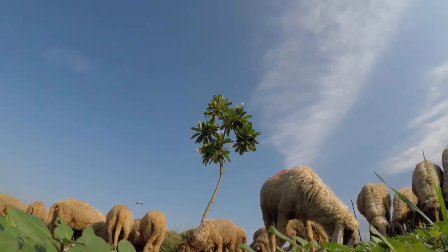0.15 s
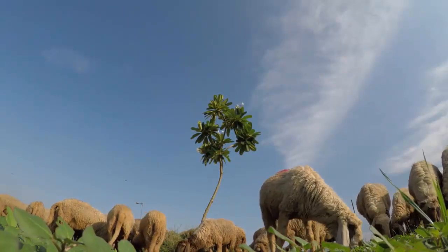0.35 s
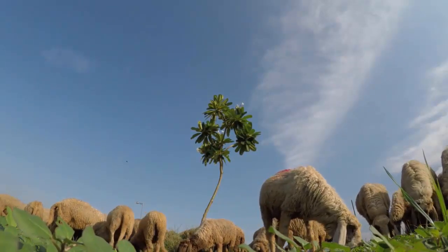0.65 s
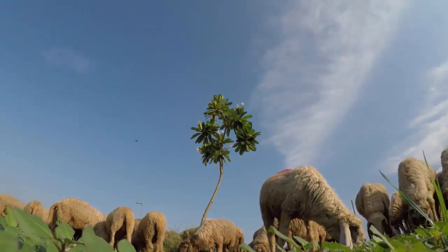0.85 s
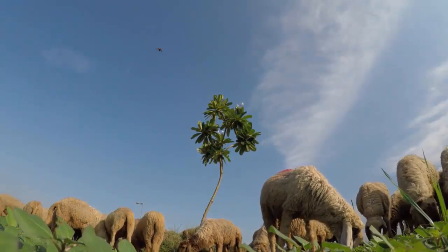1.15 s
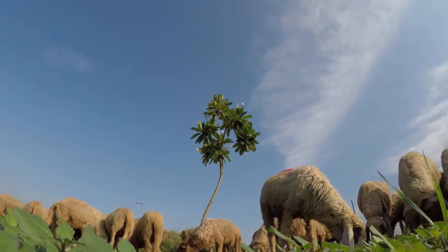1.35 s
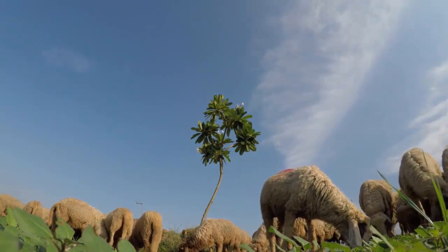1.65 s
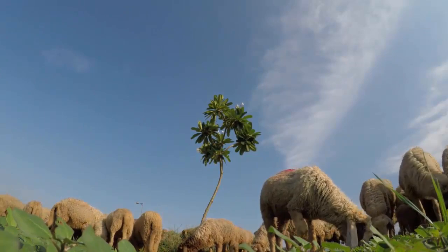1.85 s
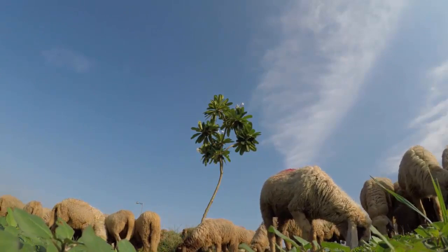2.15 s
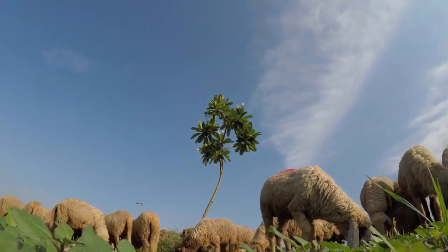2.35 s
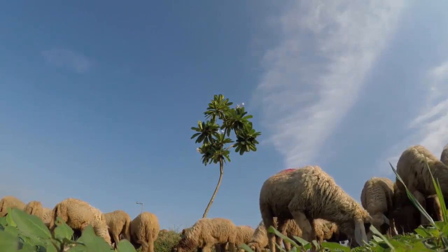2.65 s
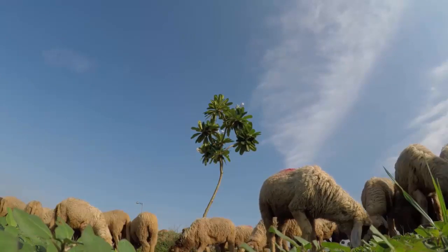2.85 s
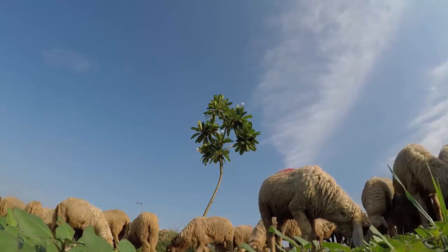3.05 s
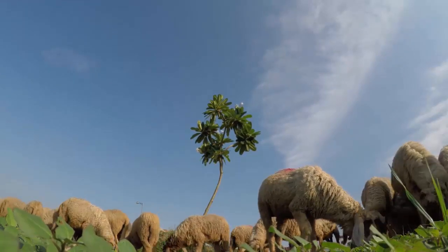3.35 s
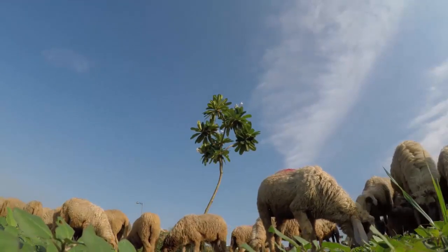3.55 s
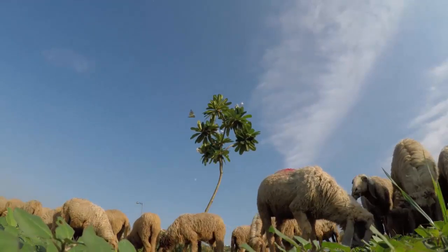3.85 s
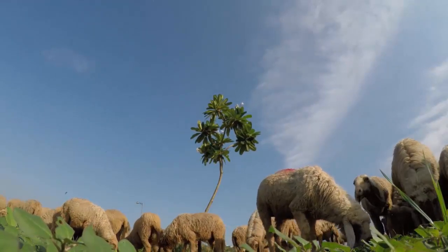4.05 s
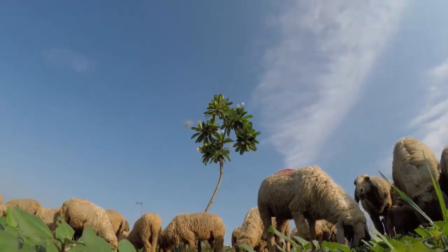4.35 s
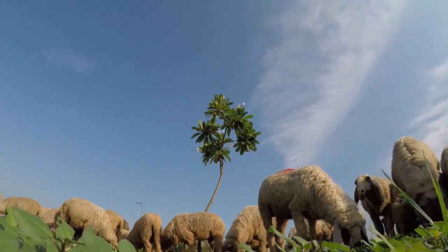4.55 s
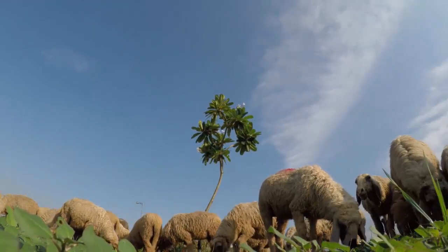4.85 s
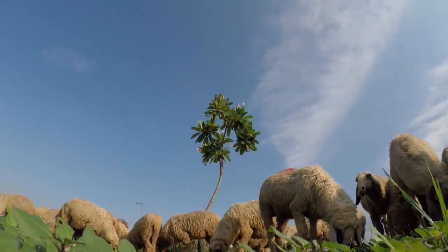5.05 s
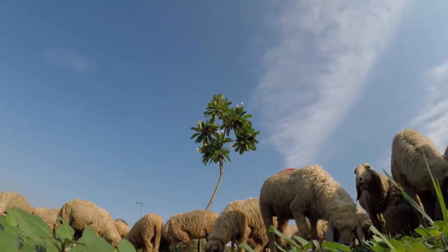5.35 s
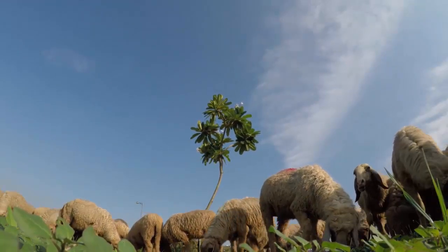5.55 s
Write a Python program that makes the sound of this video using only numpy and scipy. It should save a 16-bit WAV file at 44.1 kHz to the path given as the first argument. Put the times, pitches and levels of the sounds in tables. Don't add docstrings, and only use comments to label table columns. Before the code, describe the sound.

Several sheep bleat over one another in an open pasture, pause briefly with grass tearing, then a low call and a loud final bleat.

```python
import sys
import numpy as np
from scipy import signal
from scipy.fft import rfft, irfft, next_fast_len
from scipy.io import wavfile
from scipy.ndimage import uniform_filter1d

SR = 44100
rng = np.random.default_rng(int(sys.argv[2]) if len(sys.argv) > 2 else 0)


def voltage_ratio(decibels):
    exponent = np.asarray(decibels, float) / 20
    return 10 ** exponent


def inscribe(sig):
    pcm = np.round(np.clip(np.atleast_2d(sig).T, -1, 1) * 32767)
    wavfile.write(sys.argv[1], SR, pcm.astype(np.int16))


N = 250929


def evened(x):
    return x / np.sqrt(np.mean(x ** 2) + 1e-20)


def read(points, hz):
    f, value = np.transpose(points)
    return np.interp(np.log(hz + 1), np.log(f + 1), value)


def add(mix, s, sound):
    part = mix[round(s * SR):][:len(sound)]
    part += sound[:len(part)]


def drift(size, span):
    width = max(int(span / 50), 1)
    coarse = uniform_filter1d(rng.standard_normal(2000), width)
    coarse = uniform_filter1d(coarse, width)
    return np.interp(np.arange(size) / 50, np.arange(2000), evened(coarse))


def coloured(points):
    spectrum = rfft(rng.standard_normal(N))
    shape_db = read(points, np.fft.rfftfreq(N, 1 / SR))
    return evened(irfft(spectrum * voltage_ratio(shape_db), N))


def resonate(x, hz, *widths):
    turn = np.exp(2j * np.pi * np.cumsum(hz * np.ones(len(x))) / SR)
    low = x * turn.conj()
    for r in np.exp(-np.pi * np.array(widths) / SR):
        low = signal.lfilter([1 - r], [1, -r], low)
    return 2 * (turn * low).real


def patchy(x, depth_db):
    hz, _, z = signal.stft(x, SR, nperseg=512)
    patches = uniform_filter1d(rng.standard_normal(z.shape[1:]), 6, 0)
    patches = uniform_filter1d(patches, 8, 1)
    change_db = depth_db * evened(patches) * (hz[:, None] > 1500)
    return signal.istft(z * voltage_ratio(change_db), SR, nperseg=512)[1][:, :N]


# (f/Hz, level/dB)
GRIT = [(20, -20.5), (60, -22.5), (110, -21.5), (300, -24), (1500, -26), (4200, -28.5), (5400, -33),
        (7000, -20), (11000, -29), (13500, -19), (15000, -26.5), (15700, -10)]
# (f/Hz, level/dB)
APART = [(20, -35), (400, -24), (5000, -7), (8000, -7), (11500, -7.5), (13500, -14), (15500, -7.5)]


def swelling_hiss(dry):
    loudness = abs(uniform_filter1d((dry ** 2).mean(0), 1500)) ** 0.42
    grit = coloured(GRIT) + voltage_ratio(-10) * coloured(APART) * [[1], [-1]]
    return voltage_ratio(-26.5) * loudness * patchy(grit, 3.73)


# (f/Hz, level/dB per Hz)
AIR = [(12, -33.5), (20, -25), (33, -43), (66, -29), (383, -36.5), (1020, -39), (1420, -43), (4800, -61),
       (7760, -62.5), (14300, -40), (15600, -50)]


def still_air():
    shared = coloured(AIR)
    unlike = np.array([coloured(AIR), coloured(AIR)])
    return voltage_ratio(-72) * (shared + 0.16 * unlike)


# (f/Hz, fade time/s)
FIELD = [(200, .25), (600, .35), (1000, .95), (2000, .75), (3000, .45), (8000, .3)]


def field(x):
    taps = np.zeros((2, SR))
    at = np.arange(300, SR - 20, 20) + rng.integers(0, 20, (2, (SR - 301) // 20))
    np.put_along_axis(taps, at, rng.choice([-1., 1.], at.shape), 1)
    hz, t, z = signal.stft(taps, SR, nperseg=256)
    fade_db = -60 * t / read(FIELD, hz)[:, None]
    tail = signal.istft(z * voltage_ratio(fade_db), SR, nperseg=256)[1]
    return signal.fftconvolve(x[None], tail / np.linalg.norm(tail[0]), axes=1)[:, :N]


# (t/s, level/dB, f/Hz)
BIRD = [(2.945, -78, 6920), (2.953, -60.5, 6920), (2.963, -59, 7150), (2.989, -67, 7100),
        (3.019, -97.5, 6960), (3.031, -81.5, 7240), (3.17, -100, 7180)]


def bird():
    s, db, hz = np.transpose(BIRD)
    t = np.arange(s[0], s[-1], 1 / SR)
    whistle = resonate(rng.standard_normal(len(t)), np.interp(t, s, hz), 60)
    return s[0], voltage_ratio(np.interp(t, s, db)) * evened(whistle) * signal.windows.tukey(len(t), .05)


# (t/s, peak level/dB, centre f/Hz)
GRASS = [
    (2.983, -70, 897),
    (3.467, -65.5, 2100),
    (3.492, -55, 1170),
    (3.509, -56, 1010),
    (3.569, -57, 1400),
    (3.597, -59, 1290),
    (3.62, -56, 600),
    (3.669, -31, 1900),
    (4.531, -33.5, 1900),
    (4.546, -38.5, 1840),
]


def grass(mix):
    t = np.arange(2000) / SR
    for s, db, hz in GRASS:
        burst = resonate(rng.standard_normal(len(t)), hz, 1200, 500) * np.exp(-t / 0.011)
        burst = np.diff(burst, prepend=0)
        add(mix, s, voltage_ratio(db) * burst / abs(burst).max())


def snort():
    t = np.arange(2600) / SR
    puff = resonate(rng.standard_normal(len(t)), 4700, 1500, 900)
    return 4.70, voltage_ratio(-33.5) * evened(puff) * np.sin(np.pi * t / t[-1]) ** 2


# (t/s, pitch drop as a share, length/s, level change/dB)
SLIPS = [(.552, 0.023, .012, -5), (.706, .03, 0.018, 2), (.926, 0.013, .012, 0), (1.717, .01, 0.0099, -3),
         (1.769, .005, 0.013, -2.5), (2.158, 0.0033, 0.015, -4), (2.45, 0.016, .012, 1.5),
         (2.698, 0.041, .015, 2), (3.939, 0.0033, 0.025, -0.5), (4.154, 0.013, 0.028, -0.5),
         (4.566, .005, 0.011, -7.5), (4.63, 0.0038, 0.013, -5.5), (5.05, 0.021, 0.014, -3),
         (5.255, .005, .012, -4), (5.352, .005, .03, -4), (5.463, .02, .011, 1), (5.59, .0095, .012, 0)]


def catches(t, hz, effort_db, breath):
    for at, share, slip_s, dip_db in SLIPS:
        catch = np.exp(-((t - at) / slip_s) ** 2)
        hz = hz * (1 - share * catch)
        effort_db = effort_db + dip_db * catch
        breath = breath - 0.007 * dip_db * catch
    return hz, effort_db, breath


def folds(hz, breath):
    wobble = 0.0033 + 0.017 * breath
    turns = np.cumsum(hz * (1 + wobble * drift(len(hz), 300))) / SR
    off = turns - np.round(turns)
    pulses = np.sinc(32000 * off / hz) * np.cos(np.pi * off) ** 2 / np.sqrt(hz)
    puffs = (1.2 + np.exp(-(turns % 1) / .3)) * rng.standard_normal(2 * SR)[:len(hz)]
    puffs = signal.lfilter(*signal.butter(1, [500, 3500], "band", fs=SR), puffs)
    return evened(pulses) + np.clip(breath, 0, 1) * evened(puffs)


def through_throat(drive, throat, mouth, effort_db, bright_db, slack):
    voice = np.zeros(len(drive))
    lost_db = uniform_filter1d(effort_db.max() - effort_db, 4000).clip(0, 12)
    for k, (f, width, db) in enumerate(throat):
        level_db = db + 1.49 * drift(len(drive), 1500)
        beamed = np.clip(np.log2(f / 2800), 0, 1)
        level_db = level_db + beamed * (bright_db + 31.5)
        level_db = level_db - 8 * slack * (f > 2300)
        kept = 0.39 * (f < 1200) if k else -0.86
        level_db = level_db + kept * lost_db
        voice -= (-1) ** k * voltage_ratio(level_db) * resonate(drive, f * mouth, 4.7 * width, width)
    return signal.lfilter(*signal.butter(3, 130, "high", fs=SR), voice)


def bleat(rows, throat, swell_s, breath, mouth):
    s, *columns = np.transpose(rows)
    t = np.arange(max(s[0], 0), s[-1] + .02, 1 / SR)
    effort_db, hz, bright_db = (np.interp(t, s, c) for c in columns)
    hz = uniform_filter1d(hz, 1800, mode="nearest")
    slack = 1 - hz / hz.max()
    mouth = mouth * (1 + 0.11 * slack)
    breath = breath + 0.45 * slack + .1 * np.exp(-(t - t[0]) / 0.048)
    hz, effort_db, breath = catches(t, hz, effort_db, breath)
    voice = through_throat(folds(hz, breath), throat, mouth, effort_db, bright_db, slack)
    swell = np.minimum((t - t[0]) / swell_s, 1) ** 2
    fade = np.minimum(t[::-1] - t[0], .02) / .02
    return t[0], voltage_ratio(effort_db) * evened(voice) * fade * swell


# (t/s, effort level/dB, pitch f/Hz, brightness from where the head faces, level/dB)
BLEAT_1 = [(0.0, -39.5, 219, -34), (0.044, -35.5, 217.7, -27.5), (0.094, -29, 236, -18.5),
           (0.234, -19.5, 266, -27.5), (0.352, -20.5, 271.5, -17.5), (0.66, -22.5, 261.3, -14),
           (0.74, -29.5, 251.7, -10.5), (0.85, -27.5, 247.7, -9), (0.95, -33.5, 206.7, -11)]
BLEAT_2 = [(0.69, -38, 168.5, -15.5), (0.856, -27, 231.7, -14), (0.954, -24, 282.5, -16),
           (1.086, -26, 290.5, -21), (1.252, -27.5, 296, -43.5), (1.4, -30.5, 291.8, -24.5),
           (1.756, -29.5, 289.7, -26.5), (1.985, -32, 278.4, -19), (2.04, -36, 236.6, -6)]
BLEAT_3 = [(1.27, -49, 185.2, -41), (1.38, -40.5, 219.6, -22), (1.47, -35.5, 252.2, -25),
           (1.6, -34.5, 264.3, -27.5), (1.9, -36, 255.1, -31.5), (2.05, -40, 250, -26.5),
           (2.15, -33, 247.7, -33.5), (2.36, -36.5, 239.2, -32), (2.47, -64.5, 233, -14.5)]
BLEAT_4 = [(1.86, -5.5, 166.7, -30), (1.944, -28.5, 174.5, -37), (2.078, -30, 237.8, -25),
           (2.188, -24, 255.6, -36.5), (2.37, -25, 262.9, -30.5), (2.534, -25.5, 260.3, -31),
           (2.812, -31.5, 242.9, -17.5), (2.843, -32.5, 220, -21), (2.87, -49.5, 191, -13.5)]
BLEAT_5 = [(3.645, -65, 146.7, -32.5), (3.667, -41.5, 153.9, -8), (3.712, -39.5, 159.9, -14.5),
           (3.792, -30, 171.4, -17), (3.972, -28.5, 181.9, -24.5), (4.1, -24.5, 181.6, -27.5),
           (4.294, -27.5, 179, -20.5), (4.514, -31.5, 165, -20), (4.57, -49.5, 154, -29)]
BLEAT_6 = [(4.49, -32, 159.4, -23), (4.568, -23.5, 192.7, -23), (4.65, -20, 232.7, -11),
           (4.734, -19, 280.4, -11), (4.82, -19.5, 290.3, -14), (4.952, -18.5, 297.4, -21),
           (5.192, -22.5, 297.7, -25.5), (5.45, -25.5, 289.2, -48), (5.69, -29, 279.7, -28)]
FAR_LAMB = [(3.5, -80, 307, -45), (3.53, -68, 309, -45), (3.67, -68, 309, -45)]
# (f/Hz, width/Hz, level/dB)
THROAT_A = [(291.6, 330, -11), (590, 680, -9), (1116, 500, -7), (2174, 240, 1), (3225, 176, 9.5),
            (3734, 470, -2.5), (4530, 1100, -16), (5850, 720, -19), (8430, 370, -30.5),
            (11500, 2100, -39.5)]
THROAT_B = [(274, 310, -51.5), (550, 460, -36), (885, 190, -2.5), (1915, 240, 5.5), (2725, 182, 13.5),
            (3400, 153, -6), (4200, 620, -6.5), (5160, 500, -54.5), (6630, 496, -27.5), (7660, 430, -30.5),
            (11300, 5400, -40)]
THROAT_C = [(236, 450, -61), (500, 173, -13), (1030, 140, 4.5), (1530, 330, -13), (2100, 160, 5.5),
            (3056, 410, 0.5), (3510, 310, 4.5), (4280, 420, -24.5), (5370, 280, -14.5), (7930, 1600, -47),
            (11500, 3500, -45)]
THROAT_D = [(206, 360, -22), (832, 130, 0), (1400, 300, -7.5), (1994, 77, 6), (2960, 920, -11),
            (3650, 210, -0.5), (4050, 250, -12), (5420, 230, -0.5), (6920, 220, -44), (9100, 170, -37.5),
            (12330, 2500, -49.5)]
THROAT_E = [(250, 220, -16), (830, 131, -6.5), (1510, 230, -6.5), (1892, 59, 10.5), (2600, 230, 7.5),
            (3203, 420, -10.5), (4180, 200, -10), (5300, 760, -29), (6690, 240, -27.5), (7306, 240, -31.5),
            (11020, 1700, -42.5)]
THROAT_F = [(228, 150, -53.5), (1046, 280, -2), (2190, 130, 6), (2955, 240, 9), (3194, 1400, -5),
            (4600, 1200, -13), (5370, 390, -60.5), (9800, 2500, -29)]
THROAT_G = [(1240, 200, -16), (1857, 40, 0), (2785, 80, -14)]
# (bleat, throat, distance level/dB, swell/s, breathiness 0-1, mouth opening as throat factor)
FLOCK = [
    (BLEAT_1, THROAT_A, 1.2, 0.0031, .025, 0.94),
    (BLEAT_2, THROAT_B, 2.8, 0.05, 0.08, 0.92),
    (BLEAT_3, THROAT_F, 4.8, 0.047, .08, 1),
    (BLEAT_4, THROAT_C, -2.5, 0.1014, 0.047, 0.94),
    (BLEAT_5, THROAT_D, 4.3, 0.015, .03, 0.92),
    (BLEAT_6, THROAT_E, 0.62, 0.027, .012, 0.96),
    (FAR_LAMB, THROAT_G, -2.5, 0.013, .25, 0.99),
]


def flock(mix):
    for rows, throat, distance_db, *manner in FLOCK:
        s, voice = bleat(rows, throat, *manner)
        add(mix, s, voltage_ratio(distance_db) * voice)


# (t/s, level/dB)
GROUND = [(.0011, -16), (.0027, -10.5), (.0046, -31), (.0078, -19), (.0131, -32.5), (.0207, -14),
          (.0314, -20), (.047, -10)]


def ground(direct):
    near = direct.copy()
    for k, (s, db) in enumerate(GROUND):
        add(near, s, (-1) ** k * voltage_ratio(db) * direct)
    return near


# (f/Hz, phase/radians)
LEAD = [(0, 0), (500, .55), (4130, 2.72), (4800, 3.0), (5700, 3.5), (6700, 4.2), (8300, 4.9), (13000, 6.28),
        (15500, 6.9)]
# (f/Hz, level/dB)
LOUDER = [(200, 0), (900, 2.5), (3400, 2.4), (4300, 1.4), (5600, -1.2), (8200, -5.5), (11000, -4),
          (13200, -.6)]


def ports(x):
    size = next_fast_len(N + 4096)
    hz = np.fft.rfftfreq(size, 1 / SR)
    half = voltage_ratio(read(LOUDER, hz) / 2) * np.exp(.5j * np.interp(hz, *np.transpose(LEAD)))
    return irfft(rfft(x, size) * np.array([half, 1 / half]), size)[:, :N]


def scene():
    direct = np.zeros(N)
    flock(direct)
    grass(direct)
    add(direct, *bird())
    far, wide = field(direct)
    from_left = ports(ground(direct) + voltage_ratio(-25) * far)
    around = voltage_ratio(-26.5) * wide * [[1], [-1]]
    ahead = np.zeros(N)
    add(ahead, *snort())
    return ahead + from_left + around + still_air()


def low_pass(x):
    return signal.sosfilt(signal.butter(12, 15710, fs=SR, output="sos"), x)


def record(dry):
    wet = 0.53 * np.tanh(dry / 0.57) + swelling_hiss(dry) + 0.00037
    return low_pass(wet)


dry = scene()
out = record(dry)
inscribe(out)
```